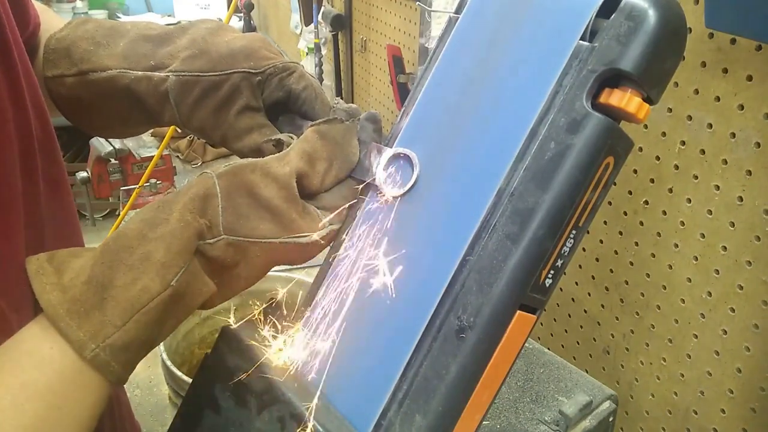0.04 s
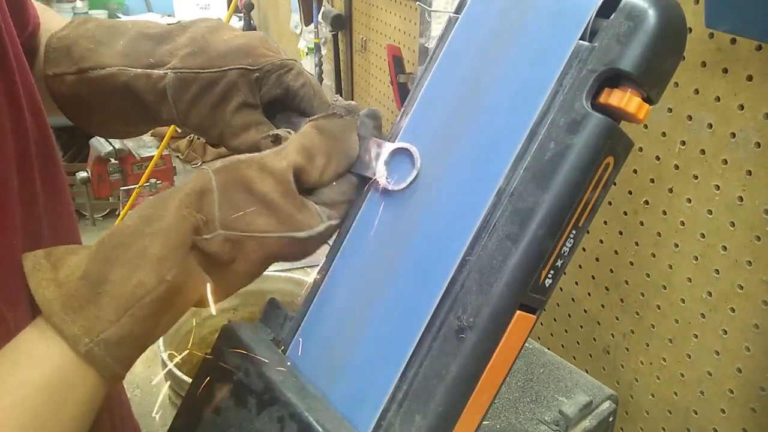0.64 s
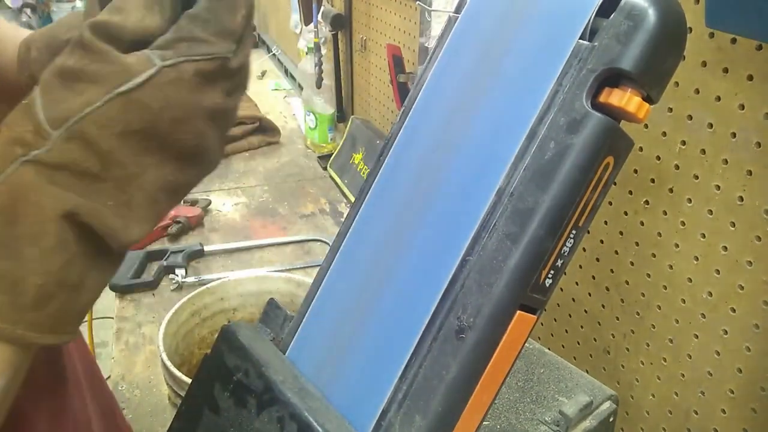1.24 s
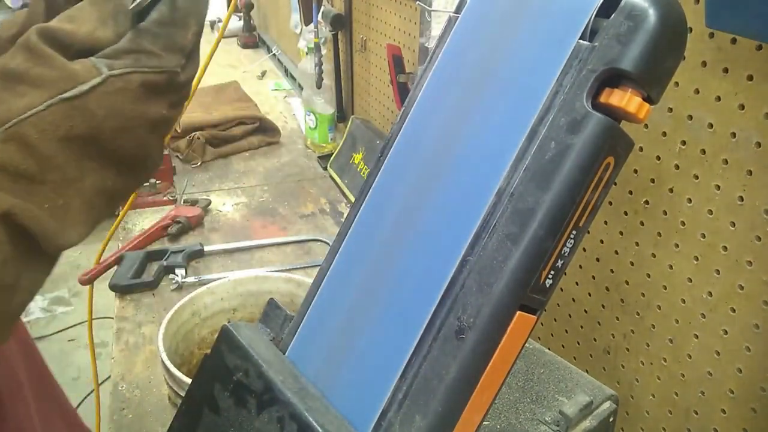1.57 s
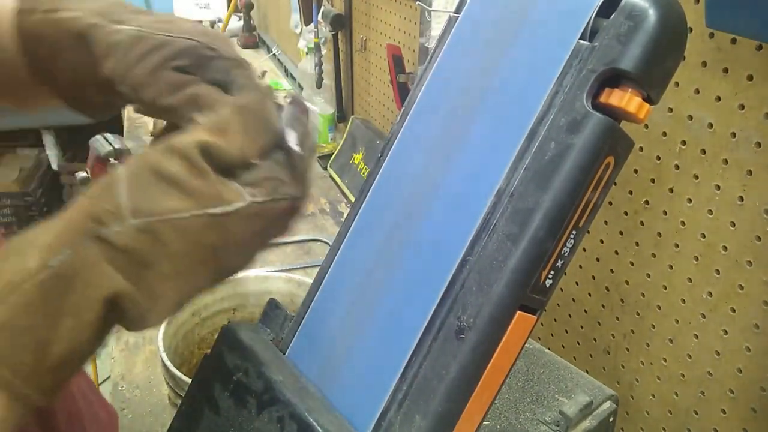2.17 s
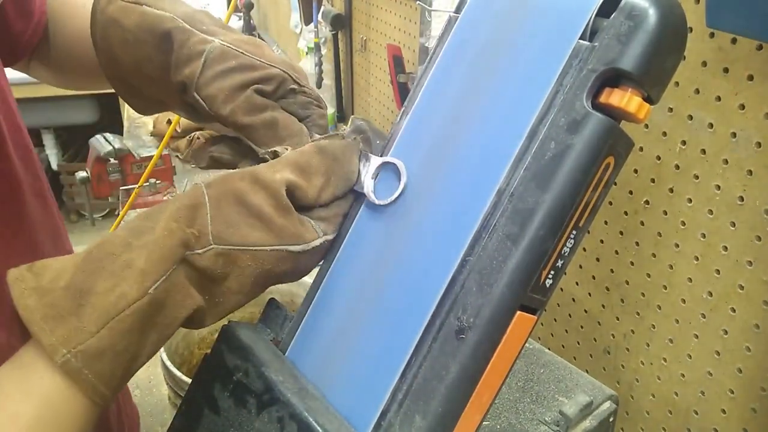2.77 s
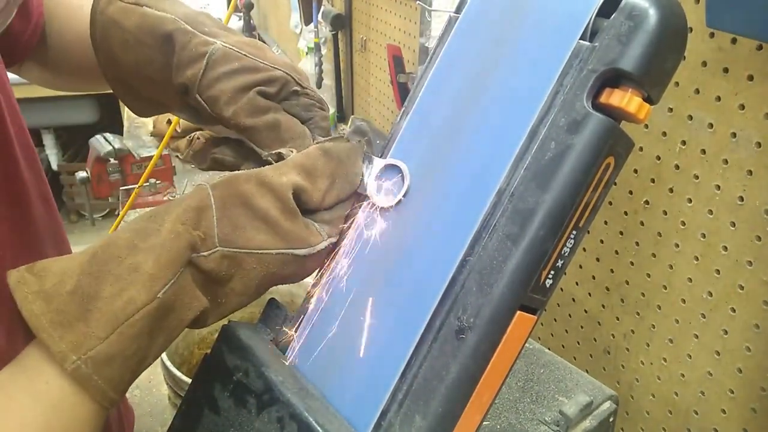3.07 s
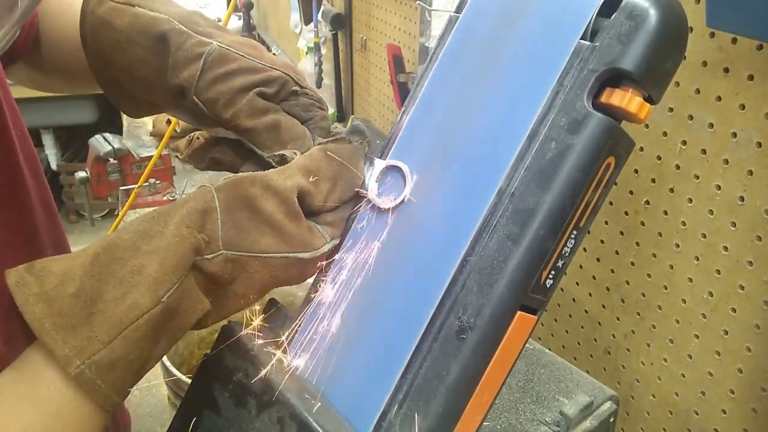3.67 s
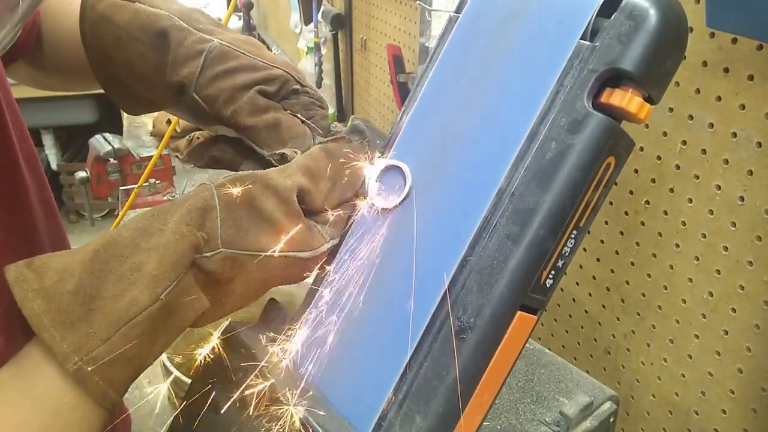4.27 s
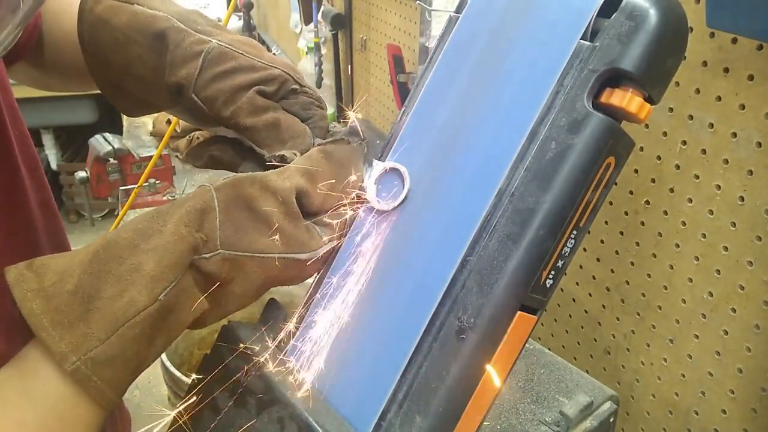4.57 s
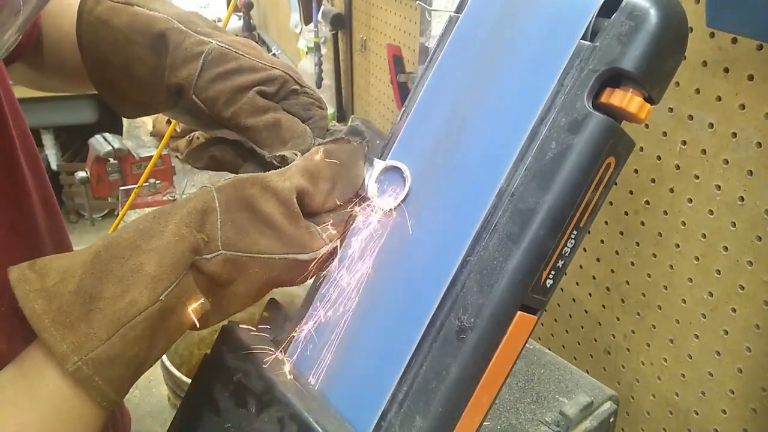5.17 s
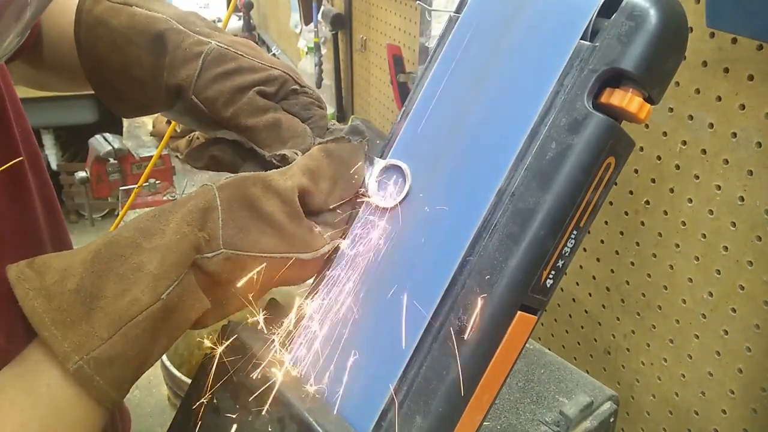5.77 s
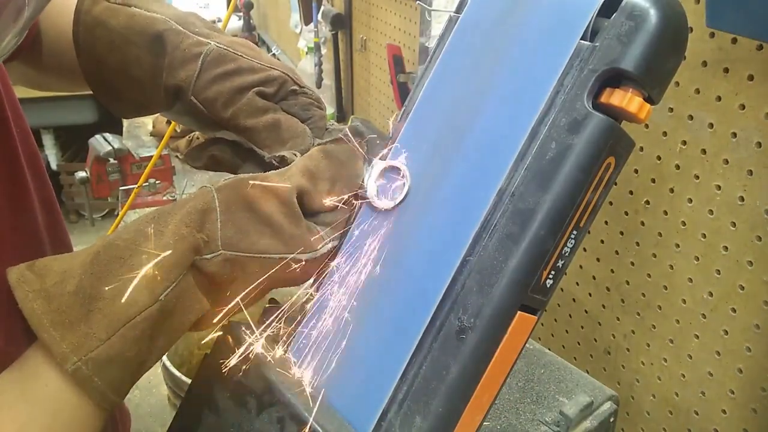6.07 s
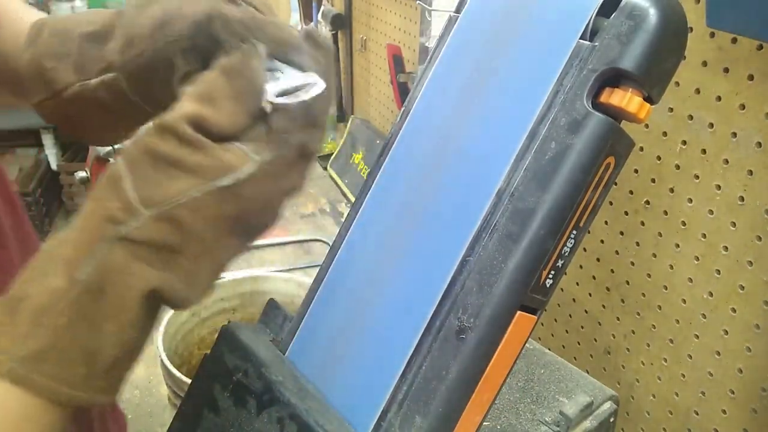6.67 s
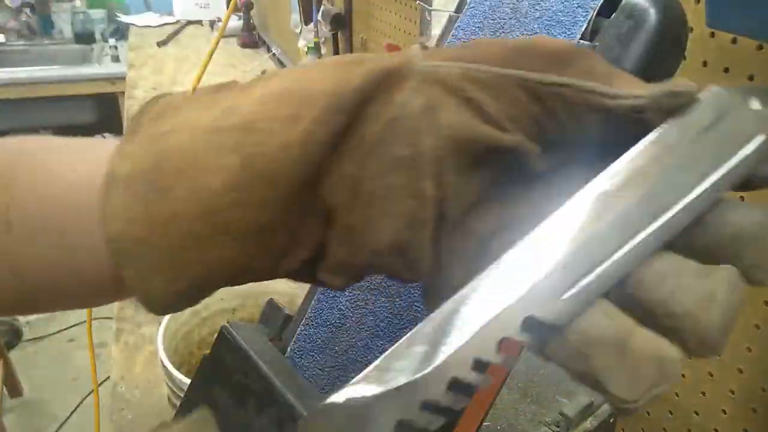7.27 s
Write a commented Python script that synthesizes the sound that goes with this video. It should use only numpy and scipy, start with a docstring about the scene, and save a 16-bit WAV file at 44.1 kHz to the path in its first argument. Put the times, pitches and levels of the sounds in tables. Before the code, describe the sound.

A belt sander runs in a small workshop, heard from nearby. Steel rasps loudly on the abrasive for a moment, then the quieter whir of the belt swells back with little chirps from the rollers. The blade returns for a longer, gritty, ringing grind and squeals twice. After a moment of free running, the sound stops abruptly, leaving a faint rustle and tap of a leather glove on metal.

```python
"""Steel blade on a belt sander.

A blade is pressed twice against a running belt in a small workshop. Grit rasps the steel in time with the laps
of the belt, and twice the blade squeals under the strain. Belt, motor and rollers run behind it; the
microphone's gain control ducks them under each pass and lets them swell back. At the end the scene changes
abruptly to a quiet room, where a leather glove handles the blade."""
import sys
import numpy as np
from scipy import signal
from scipy.fft import rfft, irfft
from scipy.io import wavfile
from scipy.ndimage import uniform_filter1d, minimum_filter1d

SR = 44100
rng = np.random.default_rng(int(sys.argv[2]) if len(sys.argv) > 2 else 0)


def wrap_up_sound(samples):
    """Save the sound to the file named by the first command line argument, as 16-bit audio."""
    columns = np.atleast_2d(samples).T
    # keep every value between -1 and 1, then stretch to whole-number steps
    tamed = np.clip(columns, -1, 1)
    steps = np.round(tamed * 32767).astype(np.int16)
    wavfile.write(sys.argv[1], SR, steps)


N = 328098
T, HZ = np.arange(N) / SR, np.fft.rfftfreq(N, 1 / SR)
MOTOR_HZ, LAP_HZ, ROLLER_TURN_S = 59.4, 9.7, .051
BITE_S, LIFT_S, LIGHT_FORCE_DB = .01, .012, -10

# Grit spectrum: f/Hz, density/dB
GRIT_SPECTRUM = [(200, -45), (450, -29.5), (560, -24), (720, -2.5), (1100, -5), (2000, 0), (2280, -14.5),
                 (2500, -6), (4000, -1), (5200, 1), (7000, -4.5), (10000, -8.5), (12500, -15), (14600, -17)]
# Blade and platen modes: f/Hz, width/Hz, boost/dB
STEEL_MODES = [(770, 16, 10), (844, 138, 10), (1037, 42, 4.5), (1315, 68, 6.5), (1501, 47, 14),
               (1645, 39, 6), (1803, 7.8, 3.5), (2006, 240, 8.5), (2466, 240, 13), (2777, 260, 8),
               (3160, 31, 5), (3430, 420, 7.5), (3980, 240, 5), (4750, 380, 1.5), (5010, 270, 7.5),
               (5640, 300, 3.5), (7360, 520, 7), (10500, 83, 7)]
# Broad low-mid resonances of the rasp: f/Hz, width/oct, boost/dB
RASP_BODY_MODES = [(653, 0.05, 8.5), (1173, 0.34, 2)]
def grit_rasp(chips_per_s=1200, chip_spread_db=3.5, chip_gain=.76, grip_width_hz=20):
    """Countless grains cut the steel, a few tear larger chips; the gloved grip broadens its modes."""
    chip_size = gain_of(chip_spread_db * np.minimum(rng.exponential(1, N), 3.5))
    chips = (rng.random(N) < chips_per_s / SR) * chip_size * rng.choice([-1, 1], N)
    cuts = (noise() + chip_gain * unit_rms(chips)) * gain_of(belt_bite_db())
    steel_db = sum(db / (1 + (2 * (HZ - hz) / (width_hz + grip_width_hz)) ** 2)
                   for hz, width_hz, db in STEEL_MODES)
    body_db = sum(db * bell(hz, octaves) for hz, octaves, db in RASP_BODY_MODES)
    return unit_rms(colour(cuts, gain_of(spectrum(GRIT_SPECTRUM) + steel_db + body_db)))


# Contact curves: t/s, force/dB, drone/dB
FORCE_AND_DRONE = [(0, -3.5, 2.5), (.7, -6.5, -1.5), (.78, -14.5, -1), (3.05, -28.5, -28),
                   (3.12, -15, -42.5), (3.3, -14, 2.5), (3.53, -11, 8.5), (3.8, -4, .5), (4.27, -8.5, -3),
                   (4.5, -6.5, -7), (4.8, -7, -5.5), (5.05, -7.5, 1), (5.23, -10, -6.5), (5.48, -1, 2.5),
                   (5.75, -4.5, 4.5), (6.12, -9.5, -8), (6.31, -11.5, -1.5), (6.5, -12, -12.5)]
# Blade on belt: touch/s, lift/s, edge whistle re rasp at light force/dB
PASSES = [(-.5, 0.779, -28), (3.049, 6.497, -33.5)]
def grinding(level_db=-1, whistle_hz=10617):
    """Force sets the loudness; a separate drone curve swells the ring, drone and low rumble."""
    force_db, drone_db = curves(FORCE_AND_DRONE)
    rasp = grit_rasp()
    lows, to_mids, to_highs = (colour(rasp, 1 / (1 + (HZ / hz) ** 12)) for hz in (600, 930, 2200))
    hiss = rasp - to_highs
    ring = (to_highs - to_mids) * gain_of(.44 * drone_db - 2.1)
    drone = (to_mids - lows) * gain_of(drone_db - 3)
    rumble = lows * gain_of(2.2 * drone_db - 1)
    grind = hiss + ring + drone + rumble
    # light contact favours the whistle
    whistle = gain_of(.4 * (LIGHT_FORCE_DB - force_db)) * tone(whistle_hz, waver=.0018, rate_hz=150)
    passes = sum(held(touch_s, lift_s, BITE_S, LIFT_S) * (grind + gain_of(db) * whistle)
                 for touch_s, lift_s, db in PASSES)
    return gain_of(force_db + level_db) * passes


def belt_bite_db(seam_at_s=3.083, seam_half_s=.0062, seam_db=7.5, first_bite_db=5):
    """Worn patches return every lap, the seam knocks under light force, the hand trembles."""
    laps = np.cumsum(LAP_HZ * (1 + .012 * wander(2))) / SR
    patches = sum(harmonic(laps, k) / (1 + (k / 4) ** 2) for k in range(1, 13))
    from_seam_s = (((T - seam_at_s) * LAP_HZ + .5) % 1 - .5) / LAP_HZ
    force_db, _ = curves(FORCE_AND_DRONE)
    looseness = 1 / (1 + np.exp((force_db - LIGHT_FORCE_DB) / 4.4))
    knocks_db = seam_db * looseness * np.exp(-.5 * (from_seam_s / seam_half_s) ** 2)
    knocks_db += first_bite_db * hump(seam_at_s, seam_half_s)
    cyclic_db = .5 * unit_rms(patches) + .46 * pulley_throb()
    tremble_db = .5 * wander(40) + .5 * wander(300)
    return cyclic_db + knocks_db + tremble_db


# Blade chatter: start/s, end/s, level/dB, rise/s, fade/s
SQUEALS = [(4.509, 4.65, -2.5, 0.047, 0.062), (6.021, 6.225, -4.5, .03, 0.017)]
def squeal(mode_hz=4562, mode_db=-3.3, screech_db=-5, octave_db=-15, third_db=-25):
    """A bending mode locks onto the belt; returns its line, its rough skirt and their envelope."""
    line = tone(mode_hz, waver=.0012, rate_hz=120) * gain_of(mode_db + 1.2 * wander(120))
    screech_shape = bell(3830, .14) + bell(4820, .13) + .76 * bell(5620, .12)
    skirt = gain_of(screech_db) * shaped_noise(screech_shape)
    skirt += gain_of(octave_db) * shaped_noise(bell(9060, .14))
    skirt += gain_of(third_db) * shaped_noise(bell(13900, .06))
    skirt *= gain_of(.62 * wander(200))
    envelope = sum(gain_of(db) * held(start_s, end_s, rise_s, fade_s)
                   for start_s, end_s, db, rise_s, fade_s in SQUEALS)
    return line, skirt, envelope


# Squeal peaks: start/s, end/s, rumble level/dB
OVERLOADS = [(4.55, 4.584, -17), (6.085, 6.108, -19)]
def mic_overload(shriek, rise_s=.018, fade_s=.054, port_lag_rad=2.5):
    """The squeal overdrives the microphone: its square leaves a rumble, nearly opposite in the ports."""
    rumble = unit_rms(colour(shriek ** 2, bell(320, .8)))
    envelope = sum(gain_of(db) * held(start_s, end_s, rise_s, fade_s) for start_s, end_s, db in OVERLOADS)
    return envelope * np.array([rumble, colour(rumble, np.exp(-1j * port_lag_rad))])


# Falling scrapes: centre t/s, half length/s, level/dB, from f/Hz, to f/Hz
SCRAPES = [(3.15, 0.049, -31.5, 1897, 1520), (3.33, 0.093, -23, 1121, 899), (3.47, .09, -31, 708, 569.4)]
def scrapes(glide_share=.22, spread_hz=190):
    """A broad contact resonance slides down as the blade beds into the belt."""
    touch_s, lift_s, _ = PASSES[-1]
    out = np.zeros(N)
    for at_s, half_s, db, from_hz, to_hz in SCRAPES:
        settled = .5 + .5 * np.tanh((T - at_s + half_s) / (glide_share * half_s))
        phase = 2 * np.pi * np.cumsum(from_hz + (to_hz - from_hz) * settled) / SR
        band = wander(spread_hz) * np.cos(phase) + wander(spread_hz) * np.sin(phase)
        out += gain_of(db) * hump(at_s, half_s) * band
    return out * gain_of(belt_bite_db()) * held(touch_s, lift_s, BITE_S, LIFT_S)


def blade_ring(start_s=5.5, end_s=6.5, mode_hz=1807, level_db=-29):
    """As the hand eases off, one mode of the blade sings until it leaves the belt."""
    envelope = held(start_s, end_s, rise_s=.1, fade_s=.015)
    return gain_of(level_db) * envelope * shaped_noise(bell(mode_hz, octaves=.012))


# Free-running belt spectrum: f/Hz, density/dB
BELT_SPECTRUM = [(30, -33), (100, -14.5), (170, -13.5), (240, -4), (420, -4), (600, -3.5), (1000, -6),
                 (1500, -9.5), (2000, -8), (2280, -10), (2900, -13), (5500, -16), (9000, -24),
                 (14600, -37.5)]
def belt_rush(level_db=-48):
    """The belt rushes over the platen, fluttering with roller and pulley."""
    flutter_db = .4 * np.sin(2 * np.pi * T / ROLLER_TURN_S) + 1.07 * wander(90) + pulley_throb()
    return gain_of(level_db + flutter_db) * shaped_noise(gain_of(spectrum(BELT_SPECTRUM)))


def pulley_throb():
    """The out-of-round pulley repeats a pattern of rms 1 every motor turn."""
    turns = np.cumsum(MOTOR_HZ * (1 + .0013 * wander(6))) / SR
    return unit_rms(sum(harmonic(turns, k) / np.sqrt(k) for k in range(1, 5)))


# Motor and pulley tones: shaft order, level/dB
SHAFT_ORDERS = [(1, -78.5), (4, -71.5), (5, -70.5), (8, -65), (9, -67.5), (10, -61), (16, -63.5)]
def motor_hum(waver_db=2):
    """Motor and pulley hum at multiples of the shaft speed."""
    turns = np.cumsum(MOTOR_HZ * (1 + .002 * wander(6.8))) / SR
    return sum(gain_of(db + waver_db * wander(8.9)) * np.sqrt(2) * harmonic(turns, order)
               for order, db in SHAFT_ORDERS)


# Roller resonances: f/Hz, width/oct, level/dB
ROLLER_MODES = [(1036, .02, -62.5), (1198, 0.0068, -69.5), (1740, .03, -84), (2650, .022, -66)]
# Squeak runs, one squeak per turn: t/s, turns, f/Hz, level/dB
SQUEAK_RUNS = [(.985, 1, 1016, -41.5), (1.502, 2, 2610, -42), (1.775, 1, 1030, -43), (1.9, 4, 2605, -43.5),
               (2.21, 1, 2575, -45), (2.31, 1, 2590, -45), (2.565, 3, 1245, -46.5), (2.615, 1, 2605, -48),
               (2.71, 1, 1700, -40), (2.715, 2, 1040, -42.5), (2.908, 3, 1026, -42),
               (3.018, 1, 2580, -35.5), (6.602, 1, 1017, -32.5), (6.702, 1, 1025, -39),
               (6.815, 2, 2590, -40)]
def rollers(half_s=.0073, squeak_spread_db=2, chirp_db=-1, chirp_spread_db=4):
    """The rollers sing faintly and chirp once a turn at random strength; at times they squeak aloud."""
    turn, within_s = np.divmod(T, ROLLER_TURN_S)
    pulse = np.exp(-.5 * ((within_s - ROLLER_TURN_S / 2) / half_s) ** 2)
    jittered_s = T + 8e-5 * wander(60)
    out = np.zeros(N)
    for hz, octaves, db in ROLLER_MODES:
        strength = gain_of(chirp_db + chirp_spread_db * noise()[turn.astype(int)])
        chirps = pulse * strength * np.sin(2 * np.pi * hz * jittered_s)
        out += gain_of(db) * (shaped_noise(bell(hz, octaves)) + chirps)
    for first_s, turns, hz, db in SQUEAK_RUNS:
        run = sum(gain_of(squeak_spread_db * rng.standard_normal()) * hump(at_s, half_s)
                  for at_s in first_s + np.arange(turns) * ROLLER_TURN_S)
        out += gain_of(db) * run * np.sin(2 * np.pi * hz * jittered_s)
    return out


# Glove strokes: t/s, level/dB, rise/s, decay/s, f/Hz, width/oct
GLOVE_STROKES = [(7.0, -69, 0.027, 0.037, 1506, 2), (7.083, -47, 0.0045, 0.021, 2800, 1.03),
                 (7.103, -44.5, 0.0097, 0.02, 2410, 1.1), (7.197, -43.5, 0.001, 0.0034, 1760, 1.2),
                 (7.204, -66, .004, 0.039, 1115, 0.053), (7.38, -70.5, .03, .06, 3000, 1.3),
                 (7.415, -66.5, 0.021, .025, 543, .2)]
def glove():
    """Leather slides over the blade and taps it."""
    out = np.zeros(N)
    for at_s, db, rise_s, decay_s, hz, octaves in GLOVE_STROKES:
        stroke = np.exp(-np.maximum((at_s - T) / rise_s, (T - at_s) / decay_s))
        out += gain_of(db) * stroke * shaped_noise(bell(hz, octaves))
    return out


# Room response: f/Hz, level re direct/dB
ROOM_SPECTRUM = [(100, -2), (900, -14), (1800, -4), (4000, -8.5), (7000, -2), (14000, 2)]
def workshop(x, t60_s=.36, early_gain=3.1, early_s=.024, echoes_per_s=4000, drift_hz=1.3, paths=3):
    """Direct sound, reflections off bench and wall, a short tail; the paths drift as the hands move."""
    t = T[:SR // 2]
    wet, tilt = gain_of(spectrum(ROOM_SPECTRUM)), gain_of(spectrum(PORT_BALANCE) / 2)
    decay = (gain_of(-60 * t / t60_s) + early_gain * np.exp(-t / early_s)) * (t > .002)
    direct = colour(x, 1 / np.sqrt(1 + wet ** 2))
    echoes = np.zeros((2, N))
    for k in range(paths):
        taps = rng.choice([-1, 1], (2, len(t))) * (rng.random((2, len(t))) < echoes_per_s / SR) * decay
        taps /= np.linalg.norm(taps[0])
        share = unit_rms(np.maximum(np.cos(2 * np.pi * (drift_hz * T + k / paths)), 0))
        echoes += signal.oaconvolve((direct * share)[None], taps, axes=1)[:, :N]
    left, right = echoes / np.sqrt(paths)
    return mic_ports(direct) + np.array([colour(left, wet * tilt), colour(right, wet / tilt)])


# Phase between ports: f/Hz, left lead/rad
PORT_PHASE = [(60, 3), (420, 1.7), (680, .3), (1700, -.2), (2000, -2.6), (2400, -3.3), (2900, -6),
              (3800, -6.3), (4600, -8.3), (5400, -11.5)]
# Balance between ports: f/Hz, left re right/dB
PORT_BALANCE = [(200, -1), (1900, -0.5), (2700, -3.5), (4200, -0.5), (5500, -2.5), (10000, -5),
                (14000, -0.5)]
def mic_ports(x, delay_s=.000374):
    """Direct sound reaches two microphone ports, a constant delay apart in the treble."""
    lead_rad = spectrum(PORT_PHASE) - 2 * np.pi * delay_s * np.maximum(HZ - PORT_PHASE[-1][0], 0)
    left_gain = np.exp(.5j * lead_rad) * gain_of(spectrum(PORT_BALANCE) / 2)
    return np.array([colour(x, left_gain), colour(x, 1 / left_gain)])


def port_notch(x, notch_hz=2277, width_hz=240):
    """The two ports cancel in a narrow band."""
    mid = x.mean(0)
    return x - mid + signal.filtfilt(*signal.iirnotch(notch_hz, notch_hz / width_hz, SR), mid)


def gain_control(x, threshold_db=-31, slope=.67, recovery_db_per_s=9.5):
    """Gain falls quickly on loud sound and recovers slowly."""
    power_db = 10 * np.log10(abs(uniform_filter1d(x.mean(0) ** 2, size=2400)) + 1e-12)
    demand_db = slope * np.maximum(power_db - threshold_db, 0)
    duck_db = np.maximum.accumulate(demand_db + recovery_db_per_s * T) - recovery_db_per_s * T
    return x * gain_of(-uniform_filter1d(duck_db, size=300))


def gain_of(db):
    """Decibels to amplitude."""
    return 10 ** (np.asarray(db) / 20)


def unit_rms(x):
    """Scales to rms 1."""
    return x / np.sqrt(np.mean(x ** 2) + 1e-20)


def spectrum(points):
    """A table's value at every frequency."""
    hz, value = np.transpose(points)
    return np.interp(np.log(HZ + 1), np.log(hz + 1), value)


def curves(rows):
    """A table's columns at every sample."""
    times_s, *columns = np.transpose(rows)
    return [np.interp(T, times_s, column) for column in columns]


def colour(x, gain):
    """Filters by a gain per frequency."""
    return irfft(rfft(x) * gain, N)


def noise():
    """White noise."""
    return rng.standard_normal(N)


def shaped_noise(gain):
    """Filtered noise, rms 1."""
    return unit_rms(colour(noise(), gain))


def wander(rate_hz):
    """Random drift, rms 1."""
    return shaped_noise(1 / (1 + (HZ / rate_hz) ** 4))


def bell(hz, octaves):
    """Smooth band around hz."""
    return np.exp(-.5 * (np.log2((HZ + 1) / hz) / octaves) ** 2)


def harmonic(turns, order):
    """Sine at a multiple of a rotation, random phase."""
    return np.sin(2 * np.pi * (order * turns + rng.random()))


def tone(hz, waver, rate_hz):
    """Sine of wavering pitch, rms 1."""
    turns = np.cumsum(hz * (1 + waver * wander(rate_hz))) / SR
    return np.sqrt(2) * harmonic(turns, 1)


def held(start_s, end_s, rise_s, fade_s):
    """Envelope: rises until start_s, holds until end_s, fades."""
    return np.exp(-np.clip(np.maximum((start_s - T) / rise_s, (T - end_s) / fade_s), 0, 20))


def hump(at_s, half_s):
    """Smooth swell around at_s."""
    return np.exp(-.5 * np.minimum(abs(T - at_s) / half_s, 10) ** 2)


def scene(stop_s=6.98, room_tone_db=-88):
    """Blade and sander until the scene changes abruptly, then the glove in the quiet room."""
    line, skirt, chatter = squeal()
    blade = grinding() + scrapes() + blade_ring() + chatter * skirt
    machine = belt_rush() + motor_hum() + rollers()
    sanding = workshop(blade + machine) + mic_ports(chatter * line) + mic_overload(line + skirt)
    running = np.clip((stop_s - T) / .0032, 0, 1)
    room_tone = gain_of(room_tone_db) * shaped_noise(gain_of(spectrum(BELT_SPECTRUM)))
    return running * sanding + workshop(glove() + room_tone)


def record(dry, preamp_db=20, ceiling=.9, cutoff_hz=15100):
    """Port notch, gain control, peak limiter, low-pass."""
    ducked = gain_control(port_notch(dry) * gain_of(preamp_db))
    limiter_gain = ceiling / np.maximum(abs(ducked).max(0), ceiling)
    limited = ducked * uniform_filter1d(minimum_filter1d(limiter_gain, size=201), size=201)
    lowpass = signal.firwin(511, cutoff_hz, window=("kaiser", 9), fs=SR)
    return signal.oaconvolve(limited, lowpass[None], "same")


dry = scene()
out = record(dry)
wrap_up_sound(out)
```